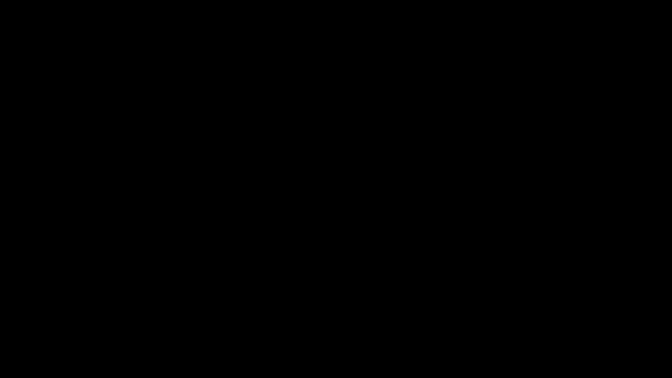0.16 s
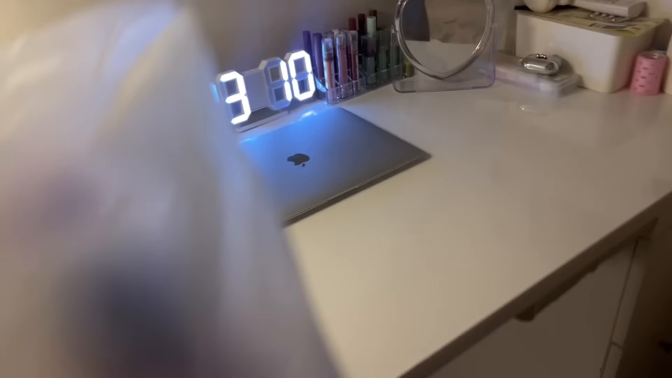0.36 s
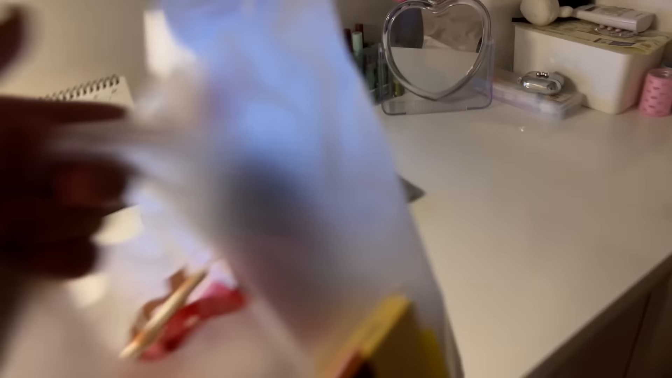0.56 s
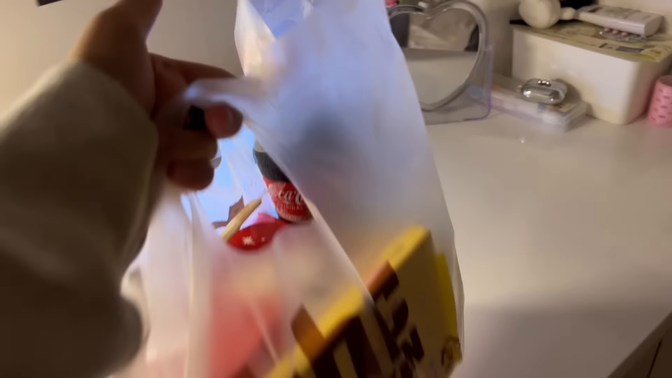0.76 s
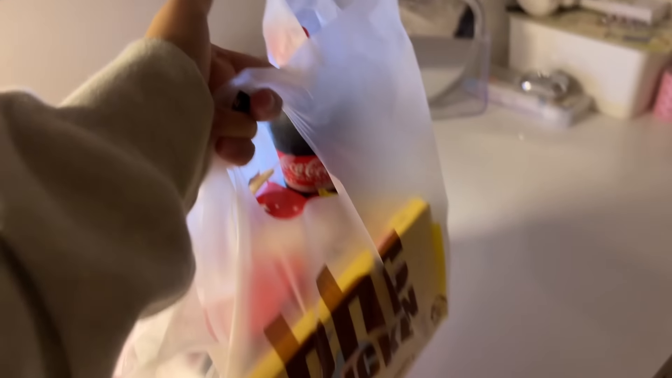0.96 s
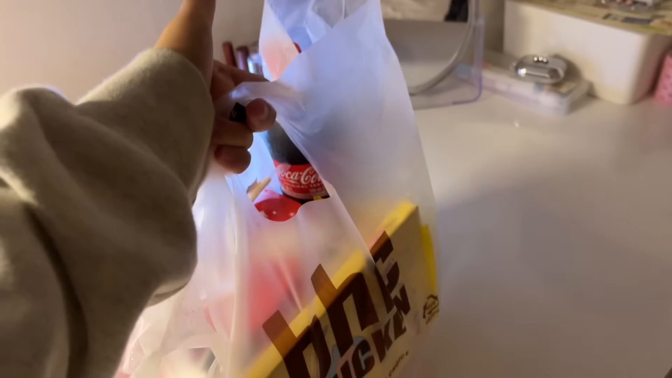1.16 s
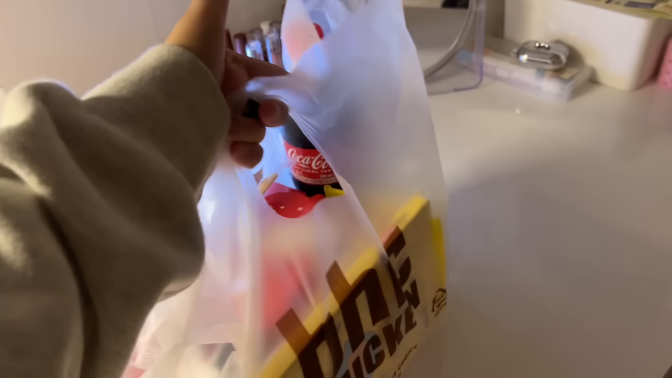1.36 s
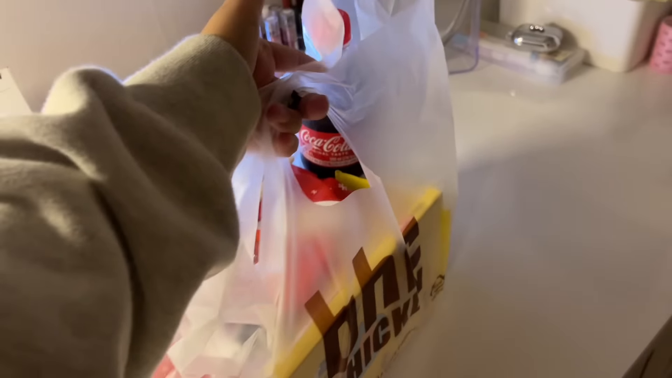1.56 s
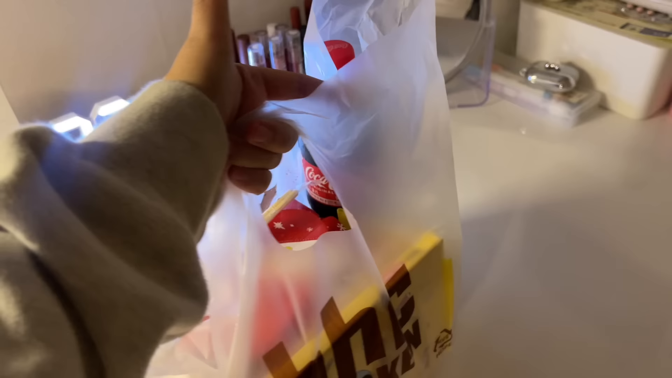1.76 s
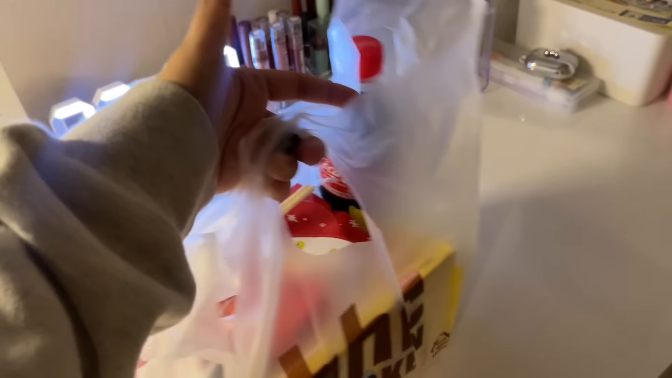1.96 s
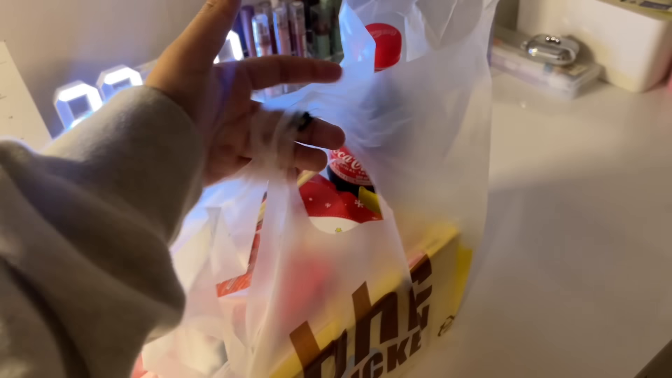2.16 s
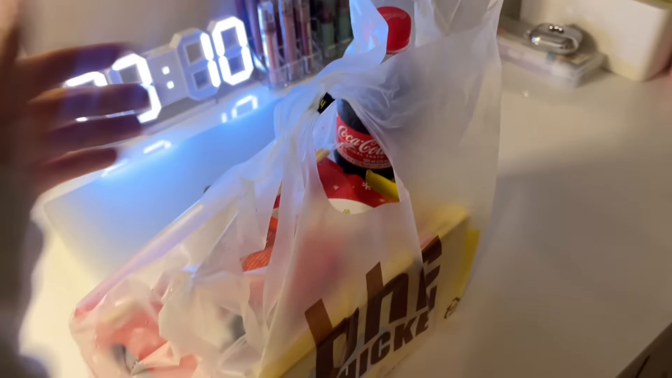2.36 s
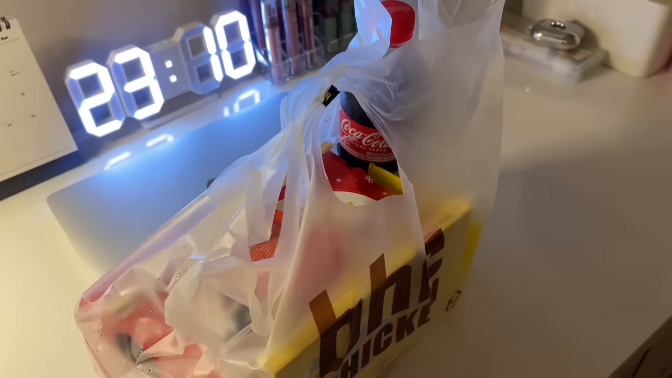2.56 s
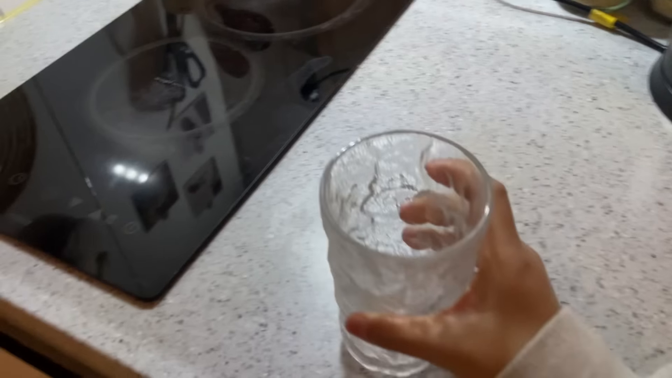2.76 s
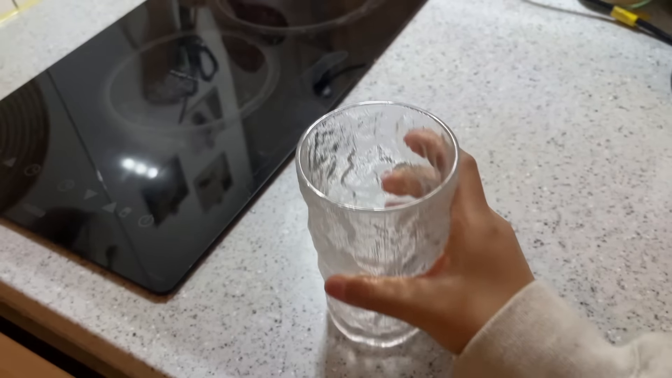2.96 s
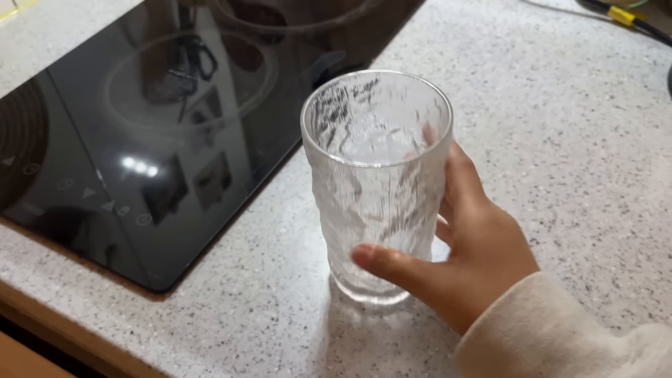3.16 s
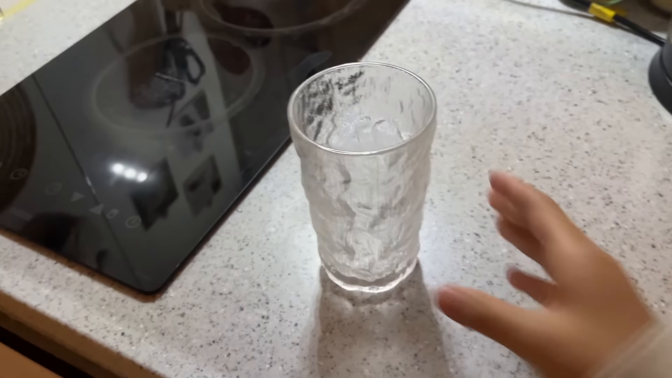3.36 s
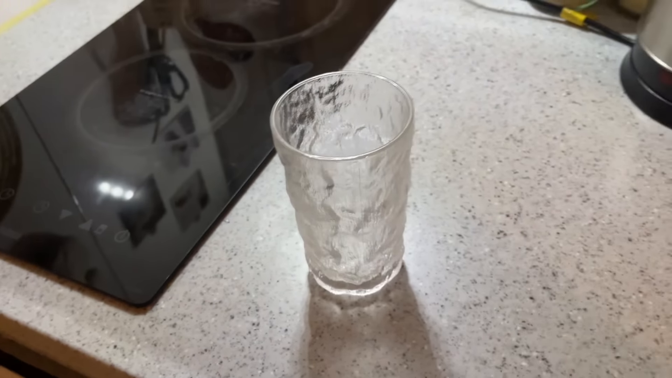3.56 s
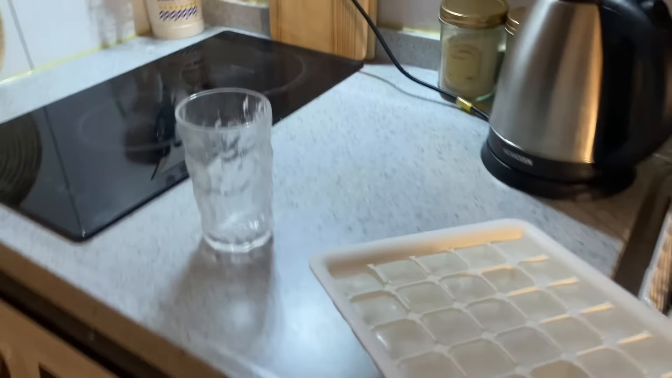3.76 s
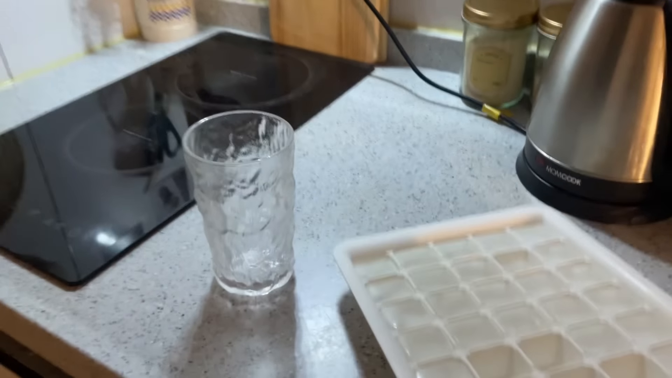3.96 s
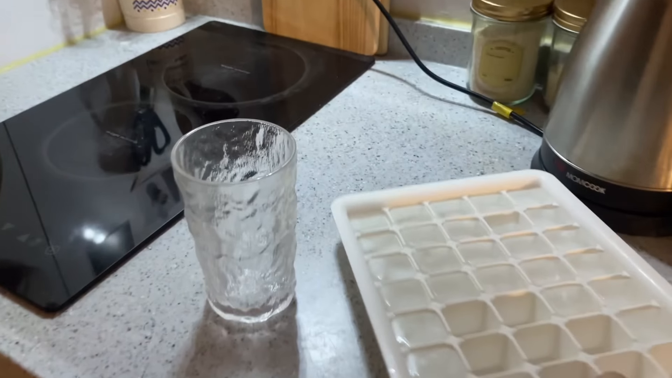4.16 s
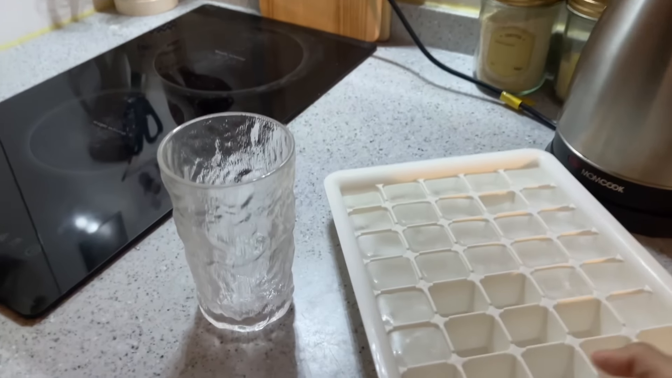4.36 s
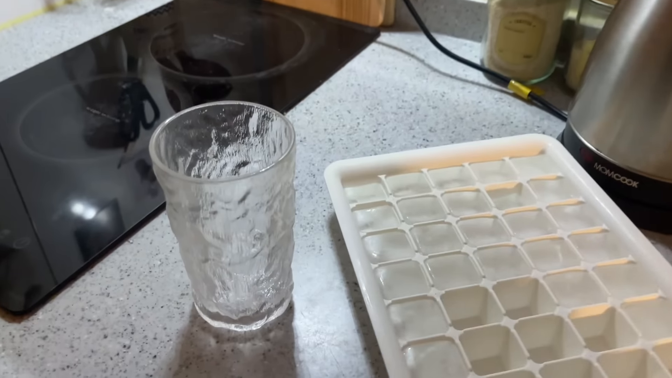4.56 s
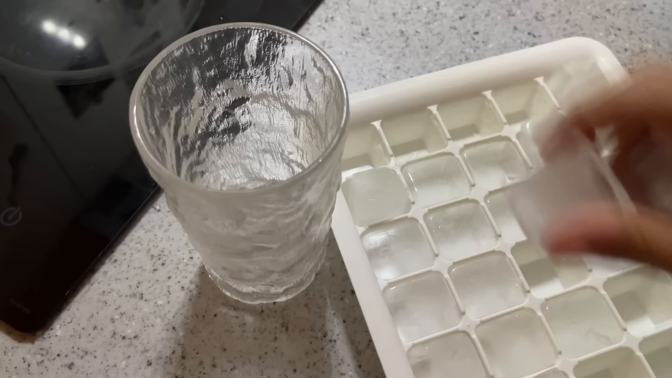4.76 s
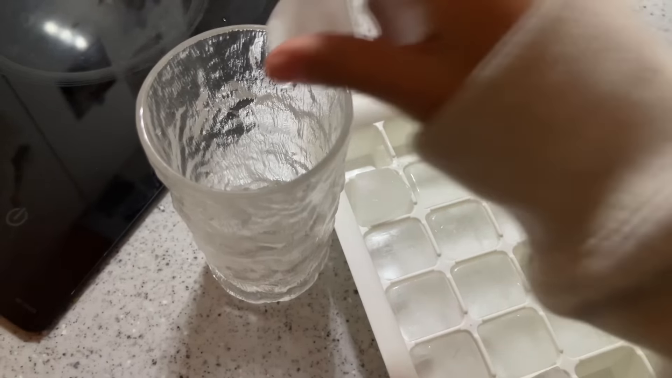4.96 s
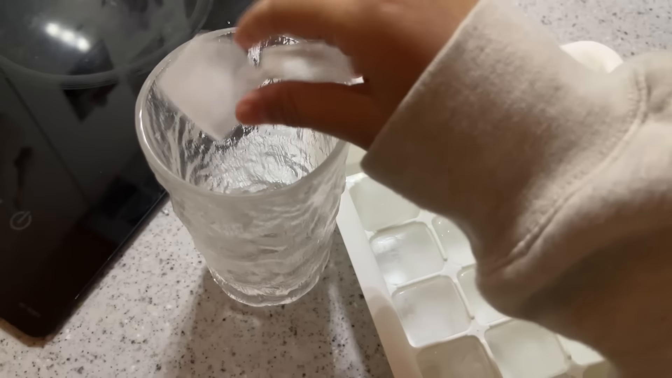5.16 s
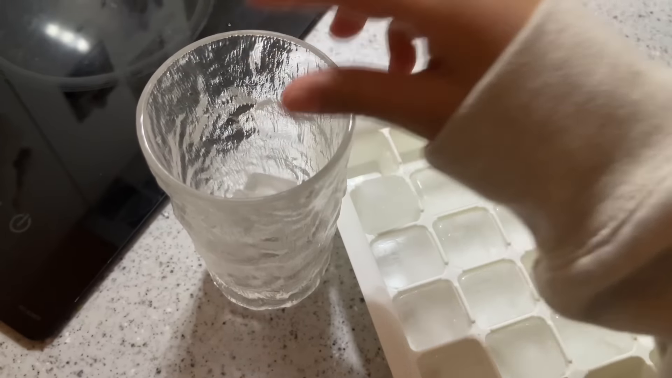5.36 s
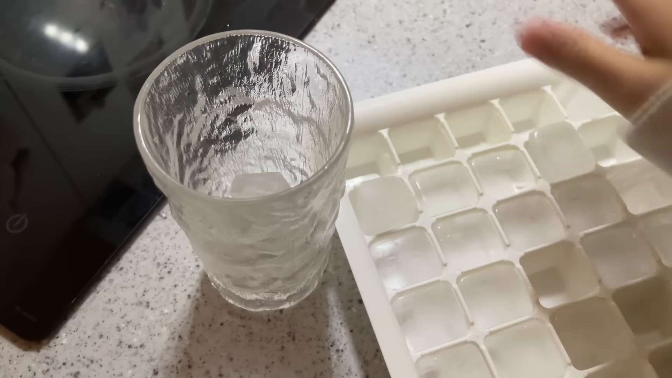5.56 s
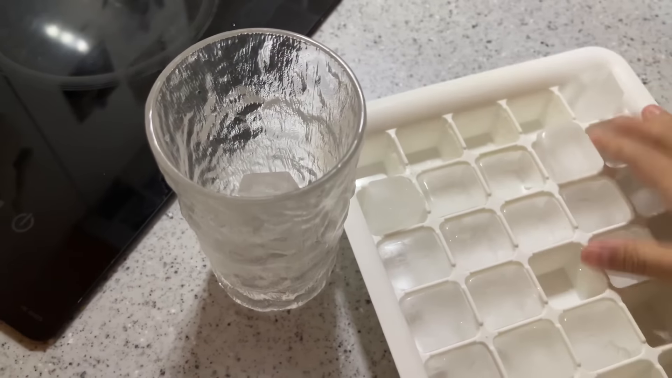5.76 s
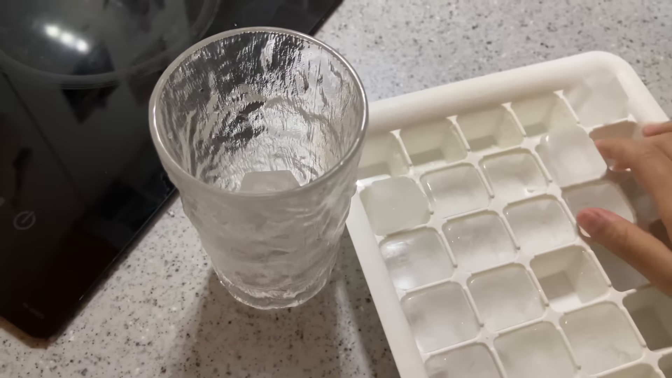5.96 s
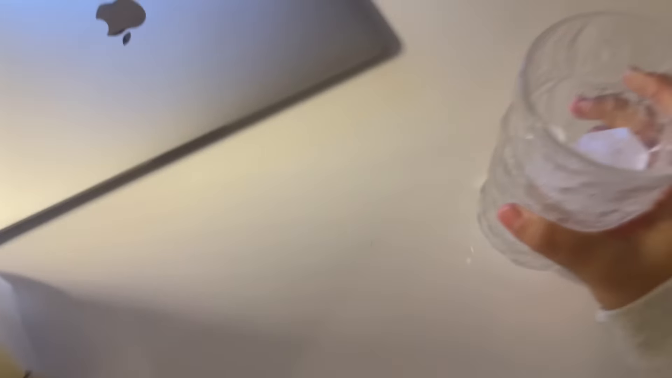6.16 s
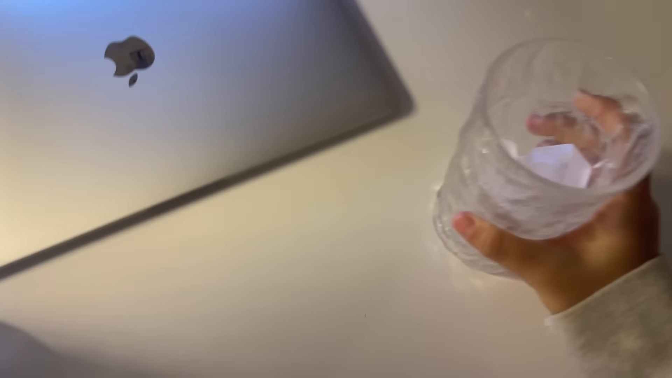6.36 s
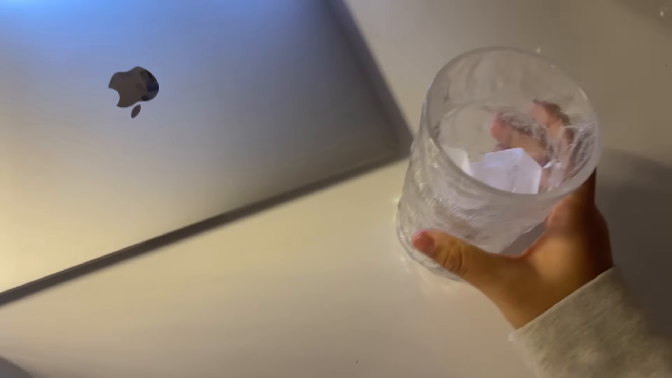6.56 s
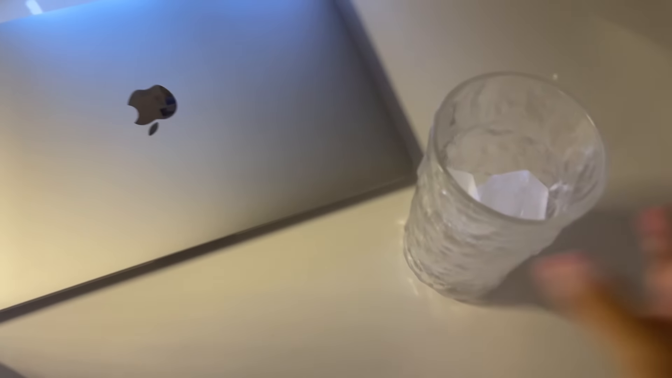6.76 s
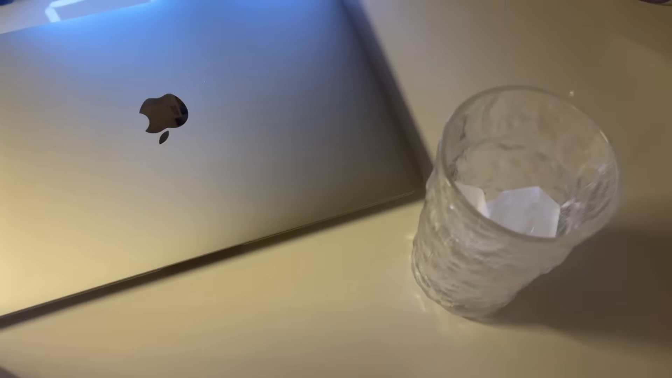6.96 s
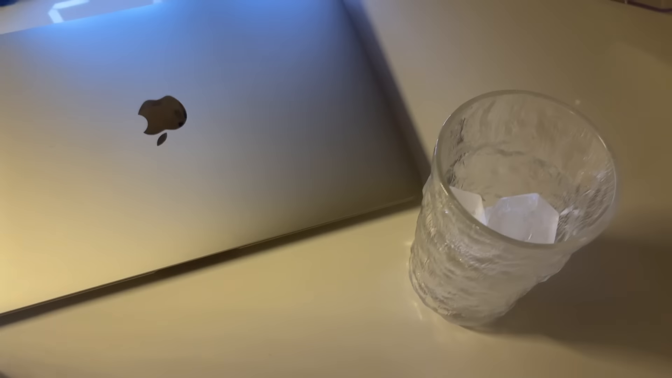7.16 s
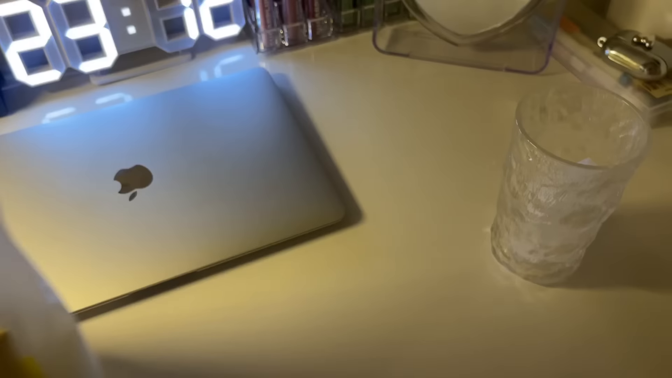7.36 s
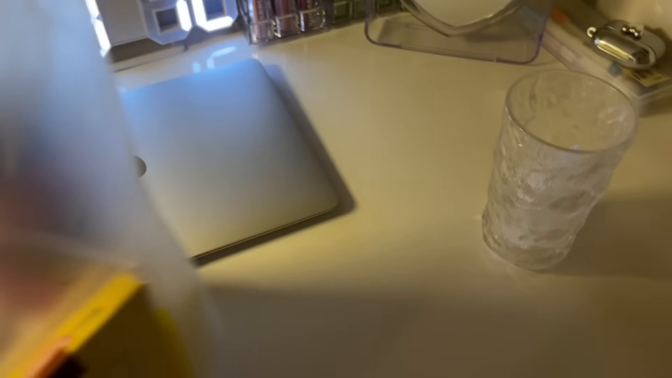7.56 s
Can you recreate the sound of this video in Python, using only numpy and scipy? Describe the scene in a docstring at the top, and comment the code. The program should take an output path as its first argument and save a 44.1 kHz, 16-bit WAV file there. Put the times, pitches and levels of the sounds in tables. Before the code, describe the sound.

Close phone pickup in small rooms, with low rumble swelling under the impacts. From 0.2 to 0.7 s a thin plastic bag gives loud, bright snaps and crinkles, then rustles more quietly. At 1.15 s it lands with a deep soft thump; denser crumpling and small thuds run from 1.5 to 2.2 s, then die away. A soft low kitchen hum fades in. At 2.7 and 2.9 s a glass knocks dully on a hard counter with brief scraping. An ice tray clacks down at 3.85-4.0 s, slides, and knocks sharply at 4.45 s. Ice clinks on the rim near 5.0 and 5.2 s, tumbles and rattles brightly inside at 5.25-5.5 s, then splits with crisp ticks to 5.6 s. The hum stops at 6.0 s. At 6.24 s the glass lands on the desk with a solid woody knock, rocking until 6.55 s. Near quiet follows: a soft thump at 7.0 s, a light tap at 7.3 s, and a faint bag crinkle around 7.6 s.

```python
"""A thin plastic shopping bag crinkles and thumps down on a desk, heard close in a small room.
In a humming kitchen a tumbler is put down and slid, an ice tray lands, and a cube clinks and rattles into the glass.
Back at the desk the glass is set down and rocks to rest, and the bag is touched again.
Knocks are short bursts of coloured noise plus decaying sine waves; crinkles and scrapes are crowds of tiny noise grains.
A phone with two microphone openings picks it all up, over a low rumble that swells with the boom of struck furniture."""
import sys
import numpy as np
from scipy import signal
from scipy.fft import rfft, irfft, next_fast_len
from scipy.io import wavfile
from scipy.ndimage import uniform_filter1d

SR = 44100
rng = np.random.default_rng(int(sys.argv[2]) if len(sys.argv) > 2 else 0)


def log_audio(samples):
    """Write samples as a 16-bit WAV file to the path given in sys.argv[1]."""
    # one column per channel
    frames = np.atleast_2d(samples).T
    # limit to full scale, then quantise
    limited = np.clip(frames, -1, 1)
    pcm = np.round(limited * 32767).astype(np.int16)
    wavfile.write(sys.argv[1], SR, pcm)


N = 339378
BLOW_TIME = np.arange(2 ** 15) / SR  # seconds, for ringing and room tails
SNAP_TIME = BLOW_TIME[:2 ** 13]  # seconds, for short cracks

# Throughout, t60 is the time in seconds that a sound takes to fade by 60 dB.
# Blows of the ice tray on the counter, and a few later dull knocks. Each row: start in seconds,
# relative ring level in dB, relative crack level in dB, tilt in dB per octave,
# pitch in Hz that the struck spot favours.
TRAY_AND_DULL_BLOWS = [(3.8482, -32, -4, -0.5, 760), (3.8848, -43, -17.5, -1.5, 520),
                       (3.9602, -29, -11.5, -3, 800), (3.968, -33, -21, -3.5, 280),
                       (3.995, -36, -22.5, -6, 420), (4.4458, -24.5, -4, 3, 1177),
                       (4.449, -27.5, -12.5, -2, 299), (4.4735, -34.5, -18, 4, 1545),
                       (4.484, -43.5, -30, 3, 750), (4.499, -48, -33, -3.5, 259),
                       (4.523, -55, -38.5, -4.5, 260), (4.797, -58, -50, -9, 633),
                       (5.11, -52, -26.5, -3, 440), (5.778, -57, -32, 4.5, 1650),
                       (5.801, -63.5, -34.5, 14, 1635)]
# Ringing tones (modes) of the counter. Each row: pitch in Hz, relative level in dB, t60 in seconds.
COUNTER_MODES = [(118, -7, .13), (215, -5, .13), (258, 1, .13), (290, -3, .09), (382, -11, .1),
                 (511, -2.5, .11), (623, -13, .12), (786, -14, .07), (1160, -12, .13), (1308, -12, .12),
                 (1490, -11, .11), (1735, -6, .07), (2207, -13, .12)]
# Tone colour of the bag's film. Each row: frequency in Hz, relative level in dB.
FILM_COLOUR = [(100, -15.5), (400, -11), (1000, -9.5), (2500, -3), (4000, -2.5), (7000, -1), (11000, 5),
               (12500, -4.5), (14000, -58.5), (17000, -30)]
# Tone colour of a soft, dull knock. Each row: frequency in Hz, relative level in dB.
SOFT_CRACK_COLOUR = [(30, -6.5), (200, -3.5), (550, 4.5), (900, -16), (1500, -31), (3000, -65.5),
                     (16000, -70)]
# Tone colour of the bag's dull rustle, also used under the hum. Each row: frequency in Hz, relative level in dB.
RUSTLE_COLOUR = [(30, -18), (120, 5.5), (350, 4), (900, -19.5), (2000, -15.5), (6000, -36.5)]


def undb(db):
    """Turn decibels into a plain amplitude factor."""
    return 10 ** (np.asarray(db) / 20)


def unit(x):
    """Scale to an rms (average strength) of 1."""
    return x / np.sqrt(np.mean(x ** 2))


def on_log(hz, points):
    """Read a curve of (Hz, value) points on a log-frequency axis."""
    f, value = np.transpose(points)
    return np.interp(np.log(np.maximum(hz, 1)), np.log(f), value)


def gain_curve(rows):
    """Join (seconds, dB) points into a gain curve that is practically silent outside them."""
    s, db = np.transpose(rows)
    return undb(np.interp(np.arange(N) / SR, s, db, left=-200, right=-200))


def add(out, s, x):
    """Mix x into out from time s."""
    i = max(int(s * SR), 0)
    out[:, i:i + x.shape[-1]] += x[..., :N - i]


def panned(x, pan_db):
    """Lean to the left: the left side is raised against the right by pan_db."""
    return x * undb(np.array([[pan_db], [-pan_db]]) / 2)


def fade(t, t60):
    """Exponential decay."""
    return np.exp(-np.log(1000) * t / np.maximum(t60, .002))


def colour(x, points, tilt_db=0):
    """Filter to a tilted (dB per octave) spectrum, with unit power gain and no sound ahead of its cause."""
    n = next_fast_len(x.shape[-1] // 2 + 1) * 2
    hz = np.maximum(np.arange(n // 2 + 1) * SR / n, 10)
    gain = unit(undb(on_log(hz, points) + tilt_db * np.log2(np.maximum(hz, 200))))
    # folding the cepstrum gives the phase that makes the filter respond at once
    cepstrum = irfft(np.log(gain))
    cepstrum[1:n // 2] *= 2
    cepstrum[n // 2 + 1:] = 0
    response = np.exp(rfft(cepstrum))
    return irfft(rfft(x, n) * response)[..., :x.shape[-1]]


def noise(apart, size=N):
    """Stereo white noise: apart 0 is the same on both sides, apart 1 fully separate."""
    shared, *separate = rng.standard_normal((3, size))
    apart = np.clip(apart, 0, 1)
    return np.sqrt(1 - apart) * shared + np.sqrt(apart) * np.array(separate)


def grains(rate, spread_db, t60):
    """Dense tiny snaps of noise, rate per second on average, more unequal in size with larger spread_db; rms 1."""
    happens = rng.random(N) < rate / SR
    sizes = happens * undb(spread_db * np.minimum(rng.exponential(size=N), 3))
    power = np.abs(signal.fftconvolve(sizes ** 2, fade(SNAP_TIME, t60) ** 2)[:N])
    return unit(np.sqrt(power) * noise(0.17))


def speckle(x, depth_db):
    """Every few milliseconds other spots sound, each strong in its own third of an octave."""
    hz, _, z = signal.stft(x, SR, nperseg=512)
    third = (3 * np.log2(np.maximum(hz, 200) / 200)).astype(int)
    gain = unit(undb(depth_db * rng.standard_normal((third.max() + 1, z.shape[-1]))))
    return signal.istft(z * gain[third], SR)[1][:, :N]


def crack(points, tilt_db, t60, apart, patchy_db=2, contact_s=0.0004, force=1):
    """Noise for the crowd of short-lived modes that builds up during contact; each spot favours its own."""
    hz = np.geomspace(30, 17000, 70)
    db = on_log(hz, points) + patchy_db * rng.standard_normal(len(hz))
    swell = 1 - np.exp(-SNAP_TIME / contact_s)
    burst = noise(apart, size=len(SNAP_TIME)) * force * swell * fade(SNAP_TIME, t60)
    return colour(burst, np.c_[hz, db], tilt_db)


def ringer(modes, detune):
    """Make a striker of decaying sine modes; chance varies each blow and side, and detunes the pitches."""
    scatter_db, turn_rad = 2.5, 0.34  # random spread of levels and of starting phases
    spot_db, spot_octaves = 10, 0.5  # lift near the struck spot's pitch, and its width
    hz, db, t60 = np.transpose(modes)
    # each mode builds up over its first cycle
    swell = np.sin(np.pi / 2 * np.minimum(BLOW_TIME * hz[:, None], 1)) ** 2
    decays = (swell * fade(BLOW_TIME, t60[:, None])).astype(np.float32)
    t = BLOW_TIME.astype(np.float32)
    octaves = np.log2(hz / hz[np.argmax(db)])  # distance from the strongest mode

    def strike(tilt_db, spot_hz=None):
        """One blow: tilt favours the high modes, the spot lifts those near its pitch."""
        chance, port, shift, phase = rng.standard_normal((4, len(hz)))
        favour = spot_db * np.exp(-(np.log2(hz / spot_hz) / spot_octaves) ** 2) if spot_hz else 0
        speed = (2 * np.pi * hz * (1 + detune * shift)).astype(np.float32)[:, None]
        start = (turn_rad * phase).astype(np.float32)[:, None]
        luck_db = scatter_db * (chance + np.outer([.5, -.5], port))
        weight = undb(db + favour + tilt_db * octaves + luck_db).astype(np.float32)
        return weight @ (np.sin(speed * t + start) * decays)
    return strike


def bend(x, lag_s, knee_hz=250):
    """Bending waves in a board: the low ones travel slower and arrive later."""
    hz = np.arange(len(BLOW_TIME) // 2 + 1) * SR / len(BLOW_TIME)
    turned = np.exp(-2j * np.pi * lag_s * hz / (1 + hz / knee_hz))
    taper = np.minimum(1, 10 * BLOW_TIME[::-1])  # fade out the last tenth of a second
    return taper * irfft(rfft(x) * turned)


def blows(rows, modes, points, apart, lag_s, t60, ring_tilt_db, detune):
    """Each blow cracks and rings the struck body; a brighter crack also favours the high modes."""
    ring_tilt_share = 0.55
    out, strike = np.zeros((2, N)), ringer(modes, detune)
    for s, ring_db, crack_db, tilt_db, *spot_hz in rows:
        blow = undb(ring_db) * strike(ring_tilt_db + ring_tilt_share * tilt_db, *spot_hz)
        add(blow, 0, undb(crack_db) * crack(points, tilt_db, t60, apart))
        add(out, s, bend(blow, lag_s))
    return out


def room(x, wet_db, build_s=0.0027):
    """Add a diffuse tail that dies sooner in the treble; long waves reach both ports alike."""
    # How fast the room falls quiet. Each row: frequency in Hz, t60 in seconds.
    room_fade = [(100, 0.81), (400, .42), (1500, 0.41), (5000, 0.27), (12000, 0.12)]
    hz = np.arange(len(BLOW_TIME) // 2 + 1) * SR / len(BLOW_TIME)
    centres = 62.5 * 2 ** np.arange(9)  # octave bands in Hz
    tail = 0
    for centre, pick in zip(centres, np.eye(len(centres))):
        band = np.sqrt(on_log(hz, np.c_[centres, pick]))
        hiss = irfft(rfft(noise(centre / 900, size=len(BLOW_TIME))) * band)
        tail = tail + hiss * fade(BLOW_TIME, on_log(centre, room_fade))
    tail = tail * (1 - np.exp(-BLOW_TIME / build_s))
    tail = tail / np.sqrt(np.sum(tail ** 2) / 2)
    return x + undb(wet_db) * signal.fftconvolve(x, tail, axes=1)[:, :N]


def background():
    """Filtered noise makes quiet room air, a fridge-like kitchen hum and a low, swelling rumble."""
    # Low rumble, swelling with the boom of struck furniture.
    # Each row: time in seconds, level in dB before the shared boost.
    rumble_swells = [(0.0, -74), (0.51, -55), (1.01, -70.5), (1.39, -56), (2.59, -61.5), (2.89, -44.5),
                     (3.54, -71), (4.05, -51), (4.39, -57.5), (4.54, -43.5), (4.97, -57), (5.23, -39.5),
                     (6.24, -70), (6.41, -47), (6.69, -59.5), (7.7, -84)]
    # Tone colour of that rumble. Each row: frequency in Hz, relative level in dB.
    rumble_colour = [(20, -15), (55, 0), (130, -1), (250, -23), (800, -34.5), (4000, -81.5)]
    # Tone colour of the kitchen air. Each row: frequency in Hz, relative level in dB.
    kitchen_colour = [(20, -22.5), (50, -13), (130, -7.5), (200, -12.5), (280, 5.5), (380, -26.5),
                      (520, -16), (850, -27), (1800, -39), (7000, -53.5), (9200, -42), (16000, -74)]
    # Tone colour of the air at the desk. Each row: frequency in Hz, relative level in dB.
    study_colour = [(18, -53), (30, -19.5), (112, -7.5), (336, -12.5), (526, -9.5), (1320, -27.5),
                    (1720, -29), (7090, -43), (8980, -58.5), (10800, -41.5), (16000, -71.5)]
    kitchen_db, study_db, hum_db, rumble_boost_db = -48, -72, -58.5, 3
    kitchen_start_s, kitchen_end_s, swell_s = 2.45, 6.02, 0.61
    hum_hz, hum_width_hz = 285, 70
    t = np.arange(N) / SR
    fade_in = np.clip((t - kitchen_start_s) / swell_s, 0, 1)
    fade_out = uniform_filter1d(1. * (t < kitchen_end_s), size=400)  # within about 9 ms
    resonance = signal.iirpeak(hum_hz, hum_hz / hum_width_hz, fs=SR)
    hum = unit(signal.lfilter(*resonance, colour(noise(0.13), RUSTLE_COLOUR)))
    kitchen = undb(kitchen_db) * colour(noise(0.35), kitchen_colour) + undb(hum_db) * hum
    study = undb(study_db) * colour(noise(0.5), study_colour)
    rumble = undb(rumble_boost_db) * gain_curve(rumble_swells) * colour(noise(.02), rumble_colour)
    return fade_in * fade_out * kitchen + study + rumble


def taps(tilt_db=5, t60=0.015):
    """Small dry knocks of noise, too light to ring the desk."""
    # Light taps on the desk. Each row: start in seconds, relative level in dB.
    tap_rows = [(7.275, -29.5), (7.309, -44), (7.394, -45.5)]
    out = np.zeros((2, N))
    for s, db in tap_rows:
        add(out, s, undb(db) * crack(SOFT_CRACK_COLOUR, tilt_db, t60, apart=0.032))
    return room(out, wet_db=-22)


def push(start_s, length_s, release_t60, attack_s=0.037):
    """Attack, hold and release of one sliding movement; a very short one never reaches full strength."""
    t = np.arange(N) / SR - start_s
    rise = np.clip(np.minimum(t, length_s) / attack_s, 0, 1)
    return rise * fade(np.clip(t - length_s, 0, 1), release_t60)


def sliding():
    """Countless small slips, as grains of noise, while things are pushed along."""
    # Scrapes of things sliding or grazing before they land, and of fingers on tray and glass.
    # Each row: start in seconds, length in seconds, scrape level in dB, grit level in dB, release t60 in seconds.
    slides = [(2.669, 0.021, -37, -58, 0.038), (2.697, 0.13, -49, -61, 0.59), (2.966, 0.2, -44, -56, 0.17),
              (3.518, 0.078, -59, -60, 0.18), (3.923, 0.22, -47, -45.5, 0.3), (4.205, 0.31, -57, -54, 0.16),
              (4.425, 0.022, -22, -28.5, 0.027), (4.448, 0.016, -39.5, -51.5, 0.6),
              (5.721, 0.29, -62.5, -61, .04), (6.221, 0.021, -38, -72.5, 0.036),
              (6.675, 0.33, -73, -77, 0.22)]
    # Tone colour of the scrape. Each row: frequency in Hz, relative level in dB.
    scrape_colour = [(100, -24), (400, -1), (520, 0.5), (750, -3.5), (1100, -4), (1310, 0.5), (1680, -4.5),
                     (2000, -5.5), (3500, -11), (6000, -43), (16000, -70.5)]
    # Tone colour of the bright grit. Each row: frequency in Hz, relative level in dB.
    grit_colour = [(1000, -35), (3500, -6.5), (6000, 1), (9000, 4), (12000, 1), (13500, -30), (17000, -27)]
    slips = speckle(grains(rate=3000, spread_db=2, t60=.015), depth_db=2)
    scrape, grit = colour(slips, scrape_colour), colour(slips, grit_colour)
    out = np.zeros((2, N))
    for s, length_s, scrape_db, grit_db, release_t60 in slides:
        out += push(s, length_s, release_t60) * (undb(scrape_db) * scrape + undb(grit_db) * grit)
    return room(out, wet_db=-8.0)


def glass_on_counter():
    """The hand damps the glass, so mostly the counter under it sounds."""
    # Blows of the glass on the counter. Each row: start in seconds, relative ring level in dB,
    # relative crack level in dB, tilt in dB per octave, pitch in Hz that the struck spot favours.
    glass_blows = [(2.686, -19.5, -13, 0.6, 328), (2.706, -28, -23, 1.6, 250),
                   (2.7385, -32, -35.5, 0.23, 252), (2.8755, -24, -11, 0.2, 620),
                   (2.894, -17, -26, 0.5, 142), (2.928, -30, -29.5, 0.3, 520), (2.951, -40, -38, 0.6, 270)]
    # Tone colour of the counter's crack. Each row: frequency in Hz, relative level in dB.
    counter_crack = [(30, 5), (250, 5.5), (700, 6.5), (1100, -3), (1700, -4), (3000, -12), (5000, -21.5),
                     (9000, -31), (12000, -51), (16000, -84)]
    out = blows(glass_blows, COUNTER_MODES, counter_crack, apart=0.72, lag_s=0.014, t60=0.11,
                ring_tilt_db=-2.5, detune=0.02)
    return panned(room(out, wet_db=-15.0), pan_db=-2.0)


def jostle(rise_s=0.005):
    """After each of these knocks comes a chatter of noise grains, like cubes settling in their cells."""
    # Tone colour of the chatter. Each row: frequency in Hz, relative level in dB.
    chatter_colour = [(40, 0), (150, -1.5), (400, 1), (850, -3), (1300, -8), (2000, -16), (3500, -21.5),
                      (7000, -33.5), (16000, -59.5)]
    under_crack_db, settle_t60 = -13, 0.13
    shaken = np.zeros((2, N))
    settling = (1 - np.exp(-BLOW_TIME / rise_s)) * fade(BLOW_TIME, settle_t60)
    for s, _, crack_db, *_ in TRAY_AND_DULL_BLOWS:
        add(shaken, s, undb(crack_db + under_crack_db) * settling)
    chatter = speckle(grains(rate=900, spread_db=3, t60=.015), depth_db=3)
    return shaken * colour(chatter, chatter_colour)


def tray_on_counter():
    """The full ice tray lands with short-lived modes and chattering cubes; a few dull knocks follow."""
    # Modes sounding under these blows. Each row: pitch in Hz, relative level in dB, t60 in seconds.
    tray_modes = [(258, -1, .08), (350, -5, .06), (425, -9, .06), (530, -6, .08), (630, -2, .06),
                  (735, -4, .08), (861, 0, .08), (950, -3, .08), (1140, -3, .07), (1190, -5, .06),
                  (1448, -5, .06), (1600, -5, .07), (1965, -6, .06), (2700, -10, .05)]
    # Tone colour of their crack. Each row: frequency in Hz, relative level in dB.
    tray_crack = [(30, 0), (200, -2.5), (500, 0), (1200, -2.5), (2200, -3.5), (3500, -17.5), (6000, -31),
                  (9000, -19.5), (12000, -33.5), (16000, -52)]
    out = blows(TRAY_AND_DULL_BLOWS, tray_modes, tray_crack, apart=0.2, lag_s=0.01623, t60=0.026,
                ring_tilt_db=-0.5, detune=0.015)
    return panned(room(out + jostle(), wet_db=-14), pan_db=-1.0)


def glass_on_desk():
    """The glass lands, then rocks unevenly to rest on its foot; mostly the desk sounds."""
    # Blows of the glass on the desk. Each row: start in seconds, relative ring level in dB,
    # relative crack level in dB, tilt in dB per octave, pitch in Hz that the struck spot favours.
    landing_blows = [(6.2415, -14.5, -4, -0.5, 694), (6.251, -18.5, -17.5, 1, 135),
                     (6.2945, -26, -14.5, 0, 135), (6.315, -25.5, -17, -2, 301), (6.324, -38, -31, -5, 134),
                     (6.3565, -26, -28.5, -2, 300), (6.3805, -26, -23.5, -2.5, 140),
                     (6.402, -29, -32, -1, 300), (6.413, -36.5, -22.5, -3, 133.4),
                     (6.4255, -29.5, -23.5, -1.5, 140), (6.444, -35, -28, -1.5, 135),
                     (6.466, -38, -39.5, 0, 300), (6.488, -38, -37, -3, 390),
                     (6.509, -43.5, -50.5, -2, 135), (6.544, -61, -49, 4.5, 300),
                     (6.564, -57, -48, 0.5, 300)]
    # Modes of the desk. Each row: pitch in Hz, relative level in dB, t60 in seconds.
    desk_modes = [(81, -18, .1), (132, 2, .155), (246, -10, .11), (286, 1.5, .17), (318, -2, .14),
                  (377, -6, .14), (412, -5, .16), (455, -12, .11), (520, -14, .06), (595, -4, .066),
                  (707, -2, .06), (770, -6, .045), (985, -13, .06), (1890, -30, .11)]
    # Tone colour of the desk's crack. Each row: frequency in Hz, relative level in dB.
    desk_crack = [(30, -24), (200, -4), (450, 3.5), (720, 4.5), (1000, -9), (1500, -12.5), (2300, -10.5),
                  (3800, -22), (5500, -24), (8000, -32.5), (11000, -26), (16000, -70)]
    out = blows(landing_blows, desk_modes, desk_crack, apart=0.24, lag_s=0.011, t60=0.039,
                ring_tilt_db=-1.5, detune=0.017)
    return room(out, wet_db=-15.0)


def pressed(modes, damping, at_hz=6500):
    """Modes of a wall with something resting on it: the high ones die first."""
    hz, db, t60 = np.transpose(modes)
    return np.c_[hz, db, t60 / (1 + max(damping, 0) * (hz / at_hz) ** 2)]


def ice():
    """A cube clinks on the rim, falls in, rings the tumbler's wall and air, and splits; the foot thuds."""
    # The held cube clinks on the rim. Each row: start in seconds, relative ring level in dB,
    # relative crack level in dB, tilt in dB per octave, favoured pitch in Hz, extra damping of the high ring (no unit).
    rim_clinks = [(4.977, -29, -22, -4, 5000, 0.27), (4.984, -35, -16.5, -7.5, 2777, .2),
                  (5.052, -60.5, -41, 3, 6500, 1), (5.178, -34, -32, 1, 2780, 2.2)]
    # The cube falls inside and rattles. Each row: start in seconds, relative ring level in dB,
    # relative crack level in dB, tilt in dB per octave.
    rattles = [(5.2559, -36, -9.5, 0), (5.2587, -35.5, -6, 3.5), (5.263, -37, -11.5, 1),
               (5.272, -29, -17, -0.5), (5.2773, -34, -17.5, 2.5), (5.284, -24, -11, 0),
               (5.293, -28.5, -22, -3.5), (5.304, -44, -26, -2), (5.3175, -38.5, -23, 0.5),
               (5.3201, -35, -14, 1.5), (5.327, -46, -22.5, 2.5), (5.3579, -33, -23.5, 3),
               (5.372, -36.5, -24.5, -1.5), (5.3765, -36, -19, 4.5), (5.399, -60, -35.5, -5),
               (5.4398, -55, -27.5, -3.5), (5.481, -73, -35, -5), (5.499, -75, -33, -7)]
    # The cold cube splits with sharp ticks. Each row: start in seconds, relative ring level in dB,
    # relative crack level in dB, tilt in dB per octave, favoured pitch in Hz.
    splits = [(5.5308, -63, -19, -2.5, 6460), (5.571, -42, -13, 0.5, 5500),
              (5.587, -57.5, -27.5, -5.5, 6500)]
    # Modes of the tumbler's wall. Each row: pitch in Hz, relative level in dB, t60 in seconds before damping.
    wall_modes = [(2742, -12, .16), (2778, -4, .22), (6460, -10, .1), (6512, 0, .18), (6560, -9, .09),
                  (10410, -22, .08), (10640, -11, .14), (11040, -12, .07), (12110, -19, .08),
                  (12480, -27, .1), (14170, -32, .08)]
    # Modes of the air in the tumbler. Each row: pitch in Hz, relative level in dB, t60 in seconds.
    air_modes = [(711, -1, .07), (1642, 0, .05), (2460, -6, .035), (3085, -2, .045), (4057, -8, .04),
                 (4092, -9, .04), (5106, -2, .035), (6040, -4, .04)]
    # Tone colour of ice hitting glass. Each row: frequency in Hz, relative level in dB.
    ice_crack = [(60, -8), (400, -4.5), (800, 4.5), (1600, 1), (2300, -1), (3900, 0), (5500, -1),
                 (8000, -7), (12000, -9), (14000, -27), (17000, -31)]
    # Tone colour of splitting ice. Each row: frequency in Hz, relative level in dB.
    split_crack = [(100, -14.5), (1500, -2.5), (3400, -11), (4100, 1), (6000, 2.5), (7500, -5),
                   (10000, -4.5), (13000, -43), (17000, -38.5)]
    air_under_crack_db, thud_under_crack_db = -16, -22.5

    rim = np.zeros((2, N))
    for *blow, damping in rim_clinks:
        rim += blows([blow], pressed(wall_modes, damping), ice_crack, apart=0.22, lag_s=0.0044, t60=0.026,
                     ring_tilt_db=5, detune=0.0015)
    inside = blows(rattles, wall_modes, ice_crack, apart=0.23, lag_s=0.0044, t60=0.018,
                   ring_tilt_db=-0.5, detune=0.0018)
    inside += blows(splits, wall_modes, split_crack, apart=0.086, lag_s=0.0021, t60=0.0082,
                    ring_tilt_db=-2.0, detune=0.00125)
    air, counter = ringer(air_modes, detune=0.0097), ringer(COUNTER_MODES, detune=0.037)
    for s, _, crack_db, _ in rattles:
        add(inside, s, undb(crack_db + air_under_crack_db) * air(tilt_db=0.5))
    for s, _, crack_db, *_ in rim_clinks + rattles:
        add(inside, s, undb(crack_db + thud_under_crack_db) * counter(tilt_db=1.0))
    return panned(room(inside, wet_db=-9.0) + room(rim, wet_db=-12), pan_db=1.5)


def crumple(snap_s=0.0011, size=110):
    """Force of a collapsing crease: one sharp flip, then uneven jerks, each size samples long."""
    steps = unit(undb(3.5 * rng.standard_normal(len(SNAP_TIME) // size + 1)))
    jerks = np.repeat(steps, size)[:len(SNAP_TIME)]
    flip = np.exp(-SNAP_TIME / snap_s)
    return 2 * flip + (1 - flip) * jerks


def crease(hz, tilt_db, t60, facet_db=4, facet_octaves=0.57):
    """A facet of film flips over and crackles briefly round its own pitch."""
    f = np.geomspace(100, 17000, 60)
    db = on_log(f, FILM_COLOUR) + facet_db * np.exp(-(np.log2(f / hz) / facet_octaves) ** 2)
    pitch_tilt_db = 0.98 * np.log2(hz / 4500)  # higher facets sound brighter
    return crack(np.c_[f, db], tilt_db + pitch_tilt_db, t60, apart=0.095, patchy_db=4.5,
                 contact_s=0.0013, force=crumple())


def folds(effort, count=300):
    """Lesser creases at random moments, stronger as the bag is handled harder."""
    folds_per_s, over_effort_db, spread_db = 26, 14.5, -4.5
    middle_hz, spread_octaves, tilt_db, t60 = 2640, 0.71, -4, 0.049
    times = np.cumsum(rng.gamma(2, .5, count)) / folds_per_s
    rows = []
    for s, (size, pitch) in zip(times, rng.standard_normal((count, 2))):
        if s * SR < N and effort[int(s * SR)] > undb(-70):
            db = 20 * np.log10(effort[int(s * SR)]) + over_effort_db + spread_db * size
            rows.append((s, db, middle_hz * 2 ** (spread_octaves * pitch), tilt_db, t60))
    return rows


def bag():
    """Big creases snap over a bed of small ones; its load and other soft things thump on the desk."""
    # The big creases snapping. Each row: start in seconds, level in dB before the shared snap level,
    # pitch in Hz, tilt in dB per octave before the pitch's own tilt, t60 in seconds.
    big_creases = [(0.03, -22.5, 2260, -3.5, 0.039), (0.235, -7.5, 7200, 12, 0.015),
                   (0.2394, -2, 7100, -1, 0.017), (0.3364, 0, 6590, -1, 0.018),
                   (0.396, -34, 2300, -11.5, 0.0081), (0.443, -14, 5200, -1.5, 0.035),
                   (0.4597, -9.5, 10800, -5.5, 0.016), (0.508, -12, 1950, -2, 0.0095),
                   (0.5193, -18, 1850, -4.5, 0.051), (0.5554, -11.5, 10900, -4, 0.11),
                   (0.5666, -7.5, 8860, -5.5, 0.016), (0.6504, -8.5, 7300, 1.5, 0.051),
                   (0.7319, -26.5, 2880, -2.5, 0.028), (0.769, -28, 3800, -7, 0.011),
                   (0.8886, -27.5, 4730, -4.5, 0.045), (0.91, -29.5, 1330, -4.5, 0.057),
                   (0.9346, -27, 2940, -7, 0.037), (0.965, -26.5, 1900, -7.5, 0.032),
                   (1.0418, -18, 9000, -4, 0.05), (1.1423, -11.5, 9280, -4, 0.17),
                   (1.154, -6.5, 1240, -0.5, 0.077), (1.1757, -17.5, 3130, 0, 0.14),
                   (1.2975, -25, 4200, -4.5, 0.094), (1.3325, -23, 2440, -5.5, 0.03),
                   (1.3753, -22.5, 4220, -5, 0.042), (1.454, -24.5, 4050, -4.5, 0.038),
                   (1.491, -13, 3260, -2.5, 0.082), (1.607, -23.5, 2920, -3, 0.17),
                   (1.63, -30, 900, -7, 0.077), (1.644, -21, 1300, -6.5, 0.07),
                   (1.6532, -12, 9460, 2.5, 0.025), (1.686, -24.5, 2200, -3.5, 0.048),
                   (1.7, -12, 3160, -0.5, 0.026), (1.721, -22, 1100, -1.5, 0.075),
                   (1.7346, -21, 1210, -2, 0.13), (1.77, -21, 1200, -3, 0.085),
                   (1.791, -21, 2200, -7.5, 0.011), (1.8203, -10.5, 5600, 3, 0.0083),
                   (1.84, -10, 3220, -2.5, 0.031), (1.871, -26, 7500, -7, 0.023),
                   (1.8792, -20.5, 1360, -3, 0.1), (1.928, -11.5, 3600, -2.5, 0.07),
                   (1.955, -20.5, 1300, -3, 0.082), (1.9817, -22, 1190, -4, 0.11),
                   (1.988, -18.5, 3000, 1, 0.077), (2.041, -29, 1200, -3.5, 0.05),
                   (2.0773, -24.5, 2040, -2.5, 0.059), (2.101, -21, 3000, -3, 0.024),
                   (2.1335, -25, 8800, 0, 0.063), (2.149, -20, 9160, -2, 0.06),
                   (2.1705, -12, 8500, 0, 0.043), (2.1895, -20.5, 11300, -5, 0.078),
                   (2.269, -26.5, 10800, 20, 0.016), (2.424, -39.5, 8900, -2, 0.029),
                   (7.53, -40, 6160, -1.5, 0.042), (7.595, -43.5, 2800, -4, 0.035),
                   (7.62, -42, 8240, 6, 0.022)]
    # How hard the bag is handled: touched, lifted, settled on the desk, touched again; one list for each spell.
    # Each row: time in seconds, effort in dB, which sets the crinkle's level.
    handling_spells = [
        [(0.0, -42), (0.03, -57.5), (0.11, -91.5)],
        [(0.21, -53.5), (0.27, -54.5), (0.47, -57.5), (0.57, -40.5), (0.7, -66.5), (0.9, -58.5), (1.0, -64.5)],
        [(1.0, -62.5), (1.28, -58), (1.55, -49), (1.8, -47), (2.04, -44), (2.1, -59.5), (2.17, -36),
         (2.25, -75), (2.5, -75.5)],
        [(7.37, -72), (7.62, -86), (7.69, -52.5)],
    ]
    # Soft thumps on the desk. Each row: start in seconds, relative ring level in dB,
    # relative crack level in dB, tilt in dB per octave, pitch in Hz that the struck spot favours.
    thump_blows = [(1.139, -37.5, -23, -2, 130), (1.146, -14.5, -25, -5.5, 66.6),
                   (1.17, -21.5, -39, -3.5, 130), (1.222, -29.5, -55, -6.5, 130),
                   (1.492, -31, -29, -5.5, 57.6), (1.628, -50.5, -35, 0, 190), (1.695, -45, -50, -4, 80),
                   (1.726, -33, -35, -6, 250), (1.76, -41, -36.5, -5, 250), (1.931, -38.5, -33, 0, 440),
                   (1.98, -32.5, -47, -4.5, 85), (2.15, -41, -34, 0, 75.7),
                   (2.366, -64.5, -42.5, -9.5, 100), (2.415, -72, -34.5, -5.5, 442),
                   (7.033, -32.5, -24, -5, 70), (7.113, -62, -40, -3, 440), (7.597, -48.5, -43, -3.5, 250)]
    # Modes of the desk under load. Each row: pitch in Hz, relative level in dB, t60 in seconds.
    loaded_desk_modes = [(57, 0, .1), (74, -1, .08), (100, -5, .06), (133, -5, .11), (192, -10, .06),
                         (252, -9, .06), (440, -14, .04)]
    snap_db, crinkle_db, large_facets_db = -8, -5.0, 6.5
    # the dull rustle of the load grows more slowly than the crinkle: dB per dB, from its level at firm effort
    firm_effort_db, rustle_db, rustle_growth = -45, -46, 0.58
    pan_middle_db, pan_spread_db = 1.5, 3.5

    effort = sum(gain_curve(rows) for rows in handling_spells)
    thumps = blows(thump_blows, loaded_desk_modes, SOFT_CRACK_COLOUR, apart=0.041, lag_s=0.015, t60=0.026,
                   ring_tilt_db=4.5, detune=0.012)
    # small and large facets crackle, each in their own time and colour
    small = colour(grains(rate=650, spread_db=4, t60=.018), FILM_COLOUR, tilt_db=-3.5)
    large = colour(grains(rate=320, spread_db=3.5, t60=.03), FILM_COLOUR, tilt_db=-4.5)
    crinkle = speckle(small + undb(large_facets_db) * large, depth_db=4)
    rustle = colour(grains(rate=330, spread_db=10.5, t60=0.033), RUSTLE_COLOUR)
    rustle_gain = undb(rustle_db) * (effort / undb(firm_effort_db)) ** rustle_growth
    out = undb(crinkle_db) * effort * crinkle + rustle_gain * rustle
    for s, db, hz, tilt_db, t60 in big_creases + folds(effort):
        pan_db = pan_middle_db + pan_spread_db * rng.standard_normal()
        add(out, s, panned(undb(db + snap_db) * crease(hz, tilt_db, t60), pan_db))
    return room(out, wet_db=-16.0) + room(thumps, wet_db=-16.5)


def scene():
    """Mix the background and all the handled things."""
    kitchen_things = glass_on_counter() + tray_on_counter() + ice()
    return background() + taps() + sliding() + kitchen_things + glass_on_desk() + bag()


def record(dry):
    """The two ports hear out of step, most of all in the treble; rumble and top are cut, high peaks rounded."""
    # How far the left port leads the right. Each row: frequency in Hz, lead in radians.
    port_lead = [(200, -1), (2000, 1.35), (3000, 0.8), (6400, .5), (7800, 1.27), (8900, 1), (9700, -3),
                 (11600, -5.5), (12700, -3), (16400, -16)]
    low_cut_hz, top_hz, ceiling = 42, 16500, .92
    n = next_fast_len(N // 2 + 1) * 2
    lead = on_log(np.arange(n // 2 + 1) * SR / n, port_lead)
    right = irfft(rfft(dry[1], n) * np.exp(-1j * lead))[:N]
    low_cut = signal.butter(6, low_cut_hz, "high", fs=SR, output="sos")
    x = signal.sosfilt(low_cut, np.array([dry[0], right]))
    x = x / (1 + (x / ceiling) ** 6) ** (1 / 6)  # round the peaks smoothly
    return signal.sosfilt(signal.ellip(8, .2, 70, top_hz, fs=SR, output="sos"), x)


dry = scene()
out = record(dry)
log_audio(out)
```